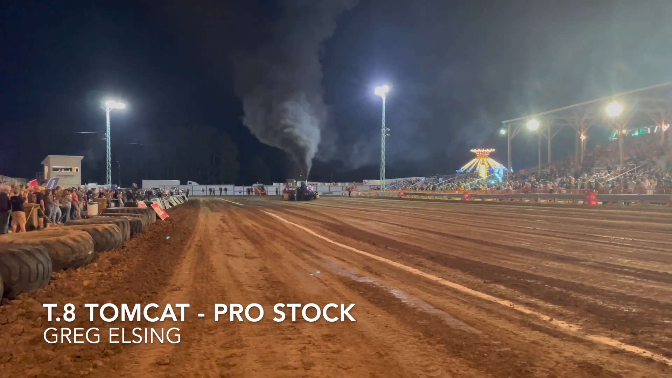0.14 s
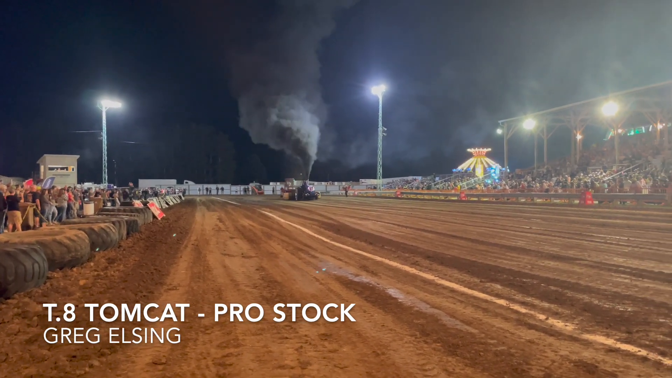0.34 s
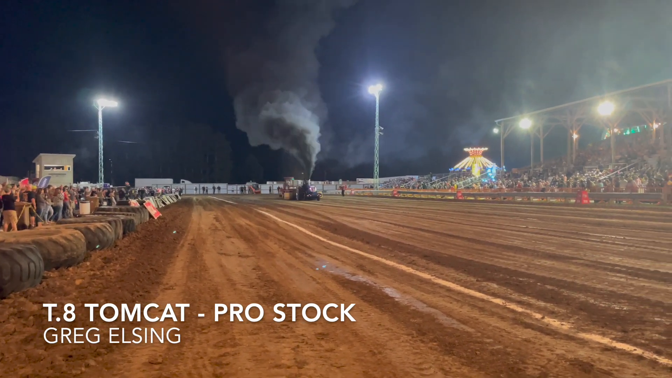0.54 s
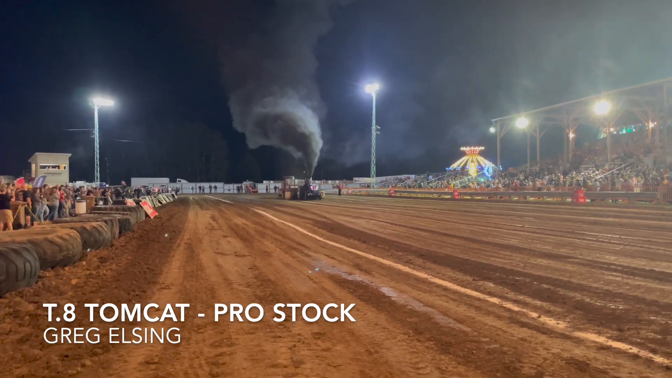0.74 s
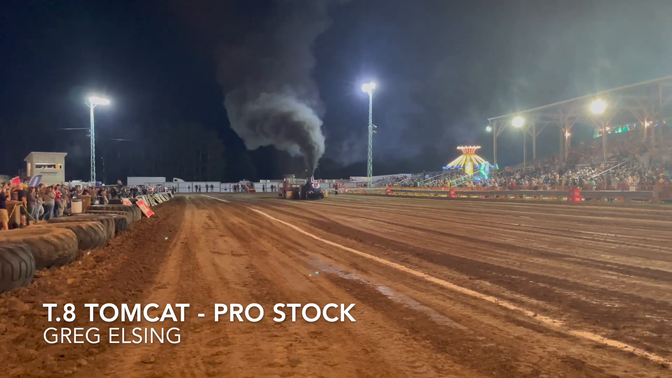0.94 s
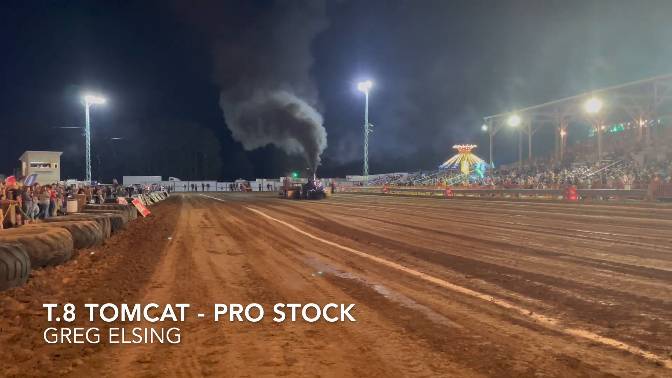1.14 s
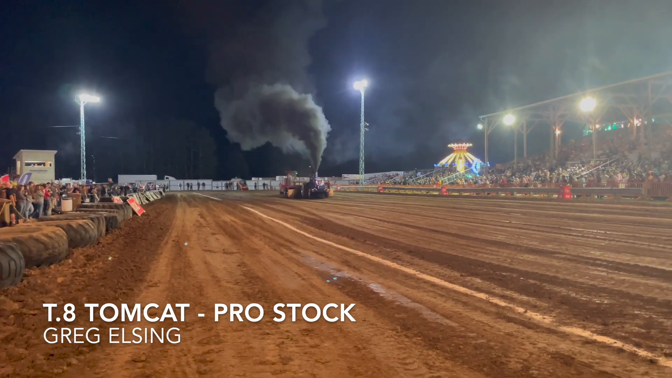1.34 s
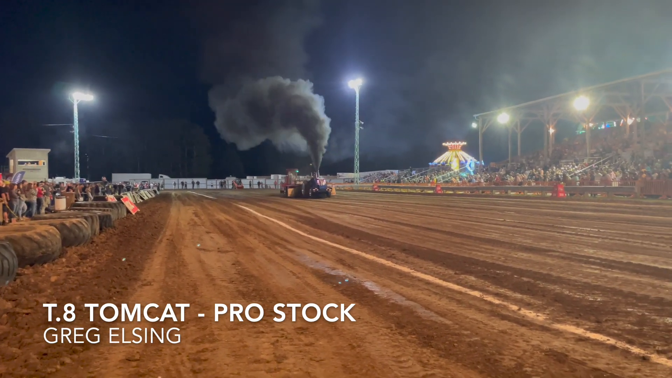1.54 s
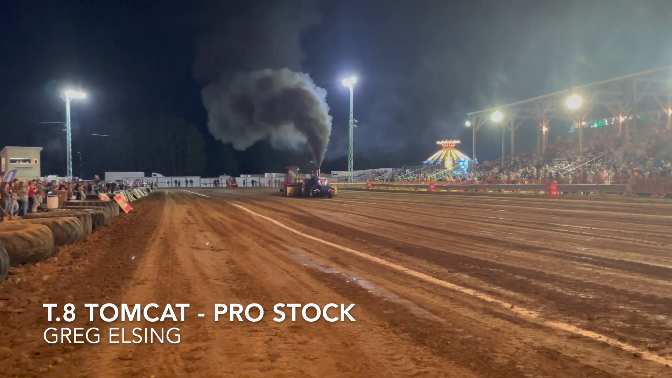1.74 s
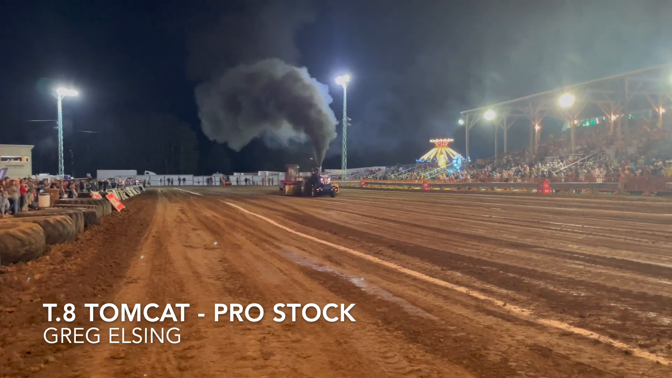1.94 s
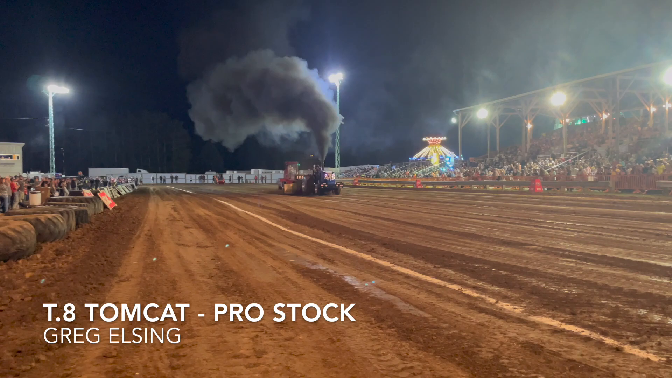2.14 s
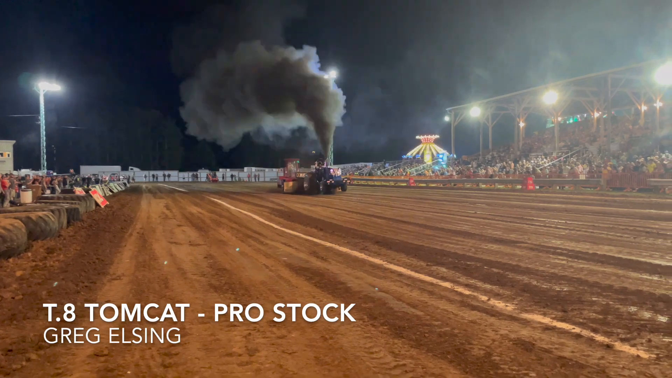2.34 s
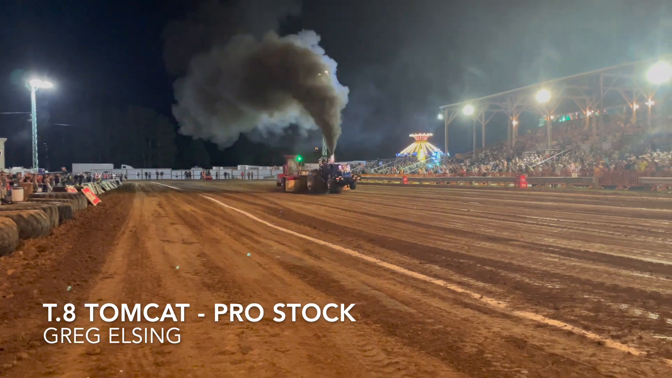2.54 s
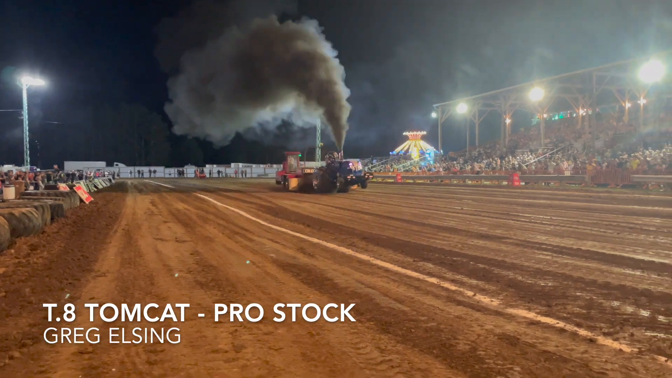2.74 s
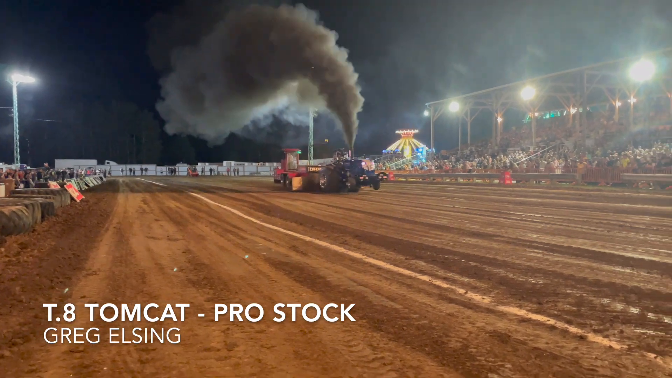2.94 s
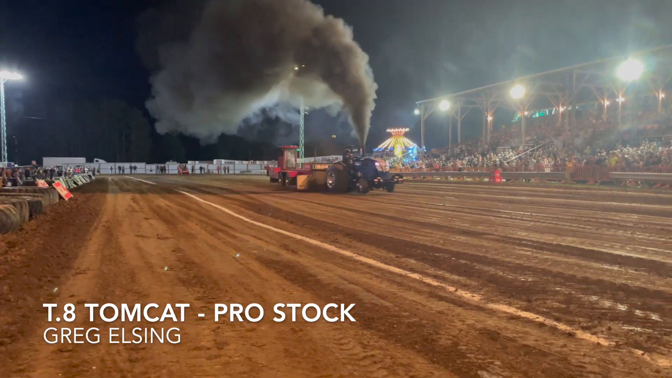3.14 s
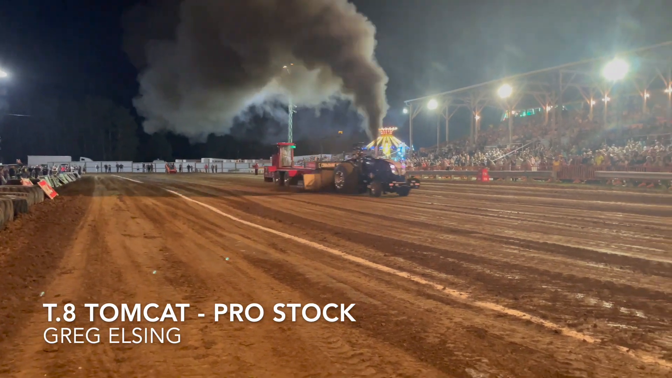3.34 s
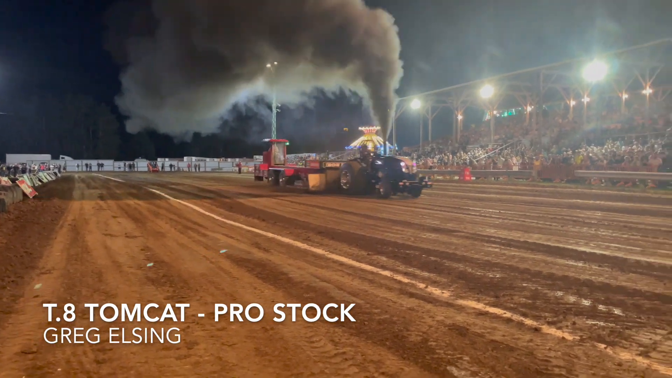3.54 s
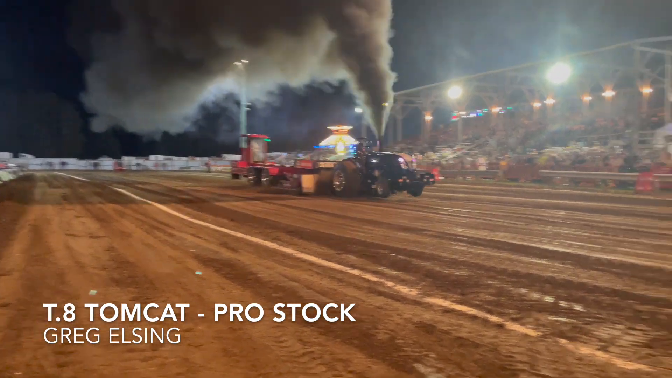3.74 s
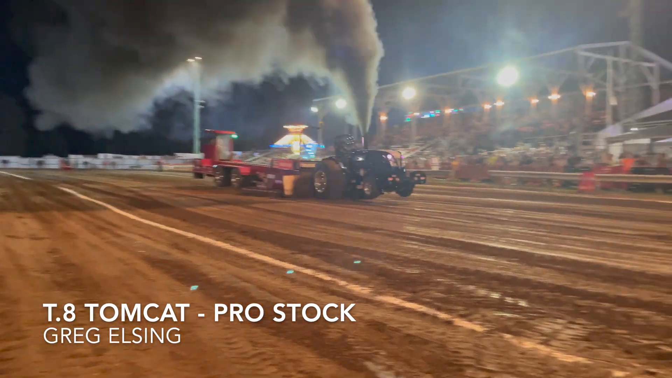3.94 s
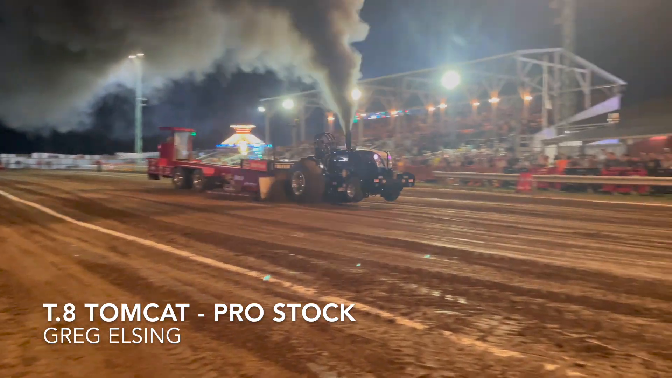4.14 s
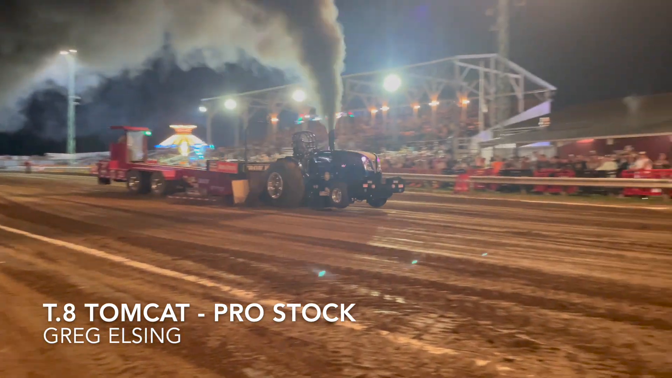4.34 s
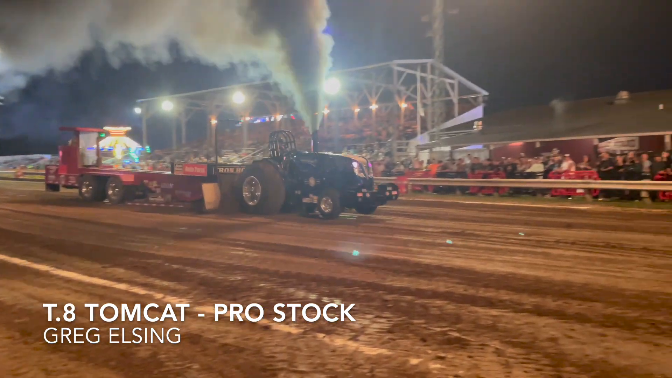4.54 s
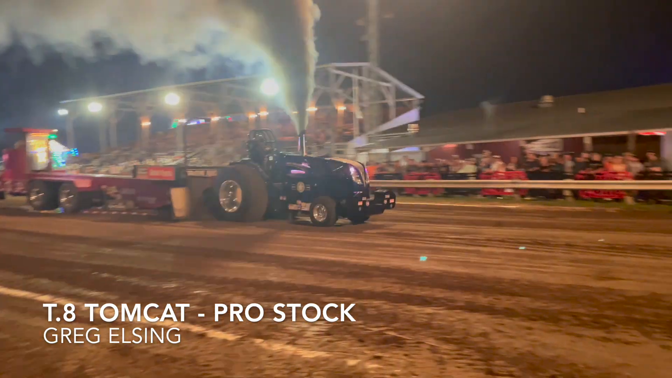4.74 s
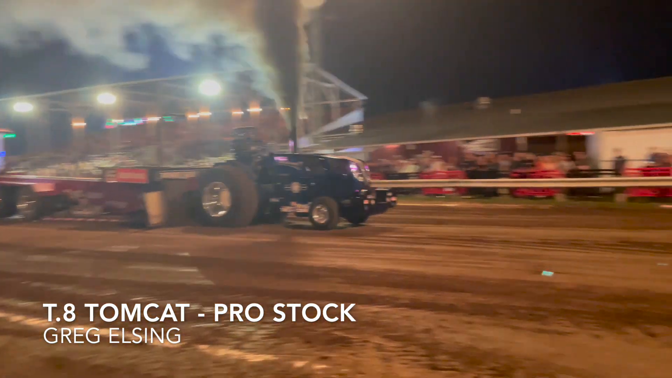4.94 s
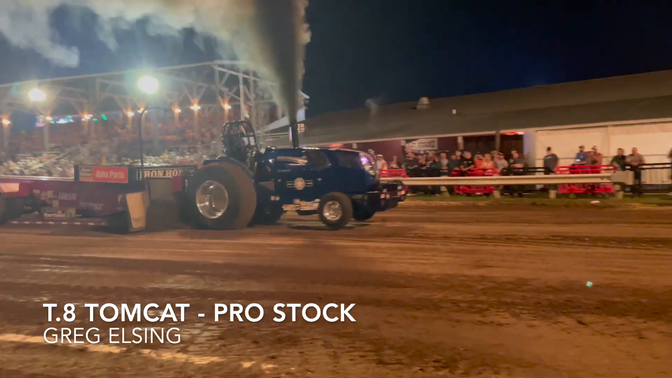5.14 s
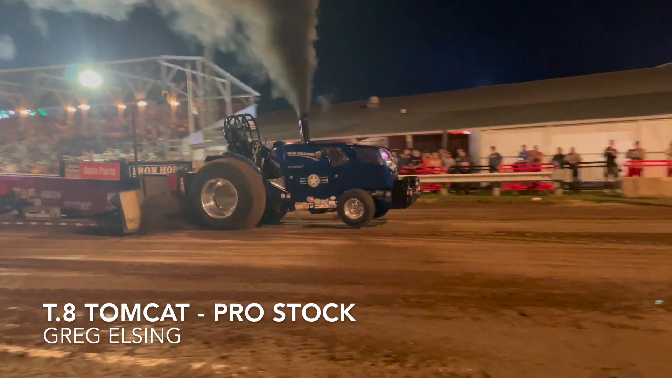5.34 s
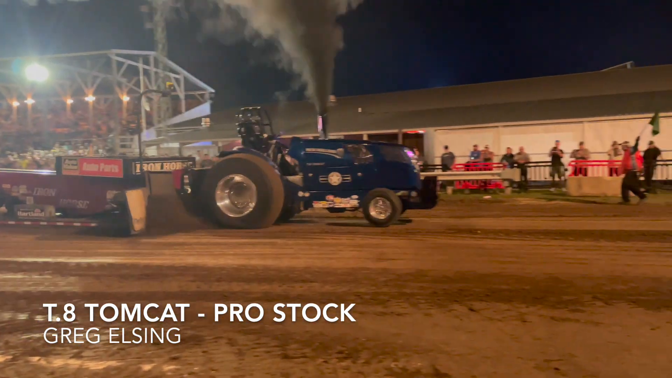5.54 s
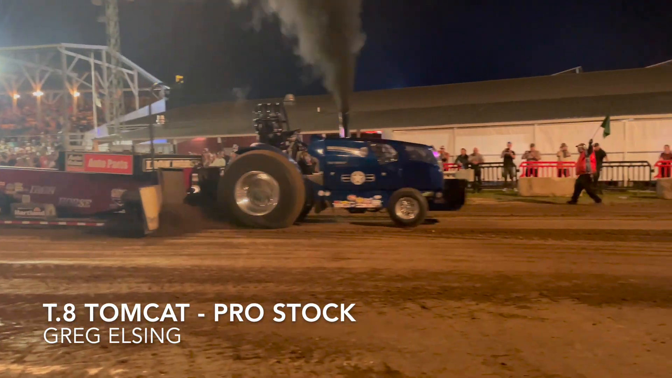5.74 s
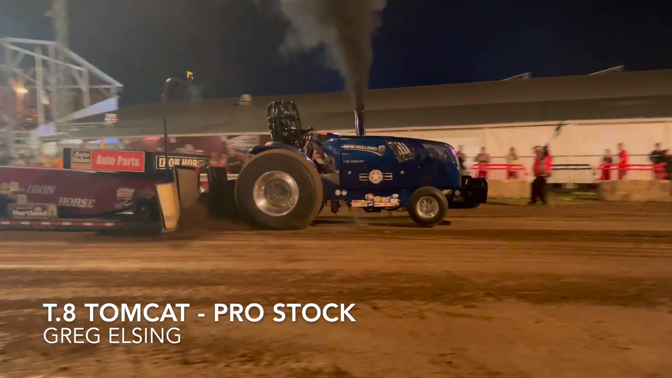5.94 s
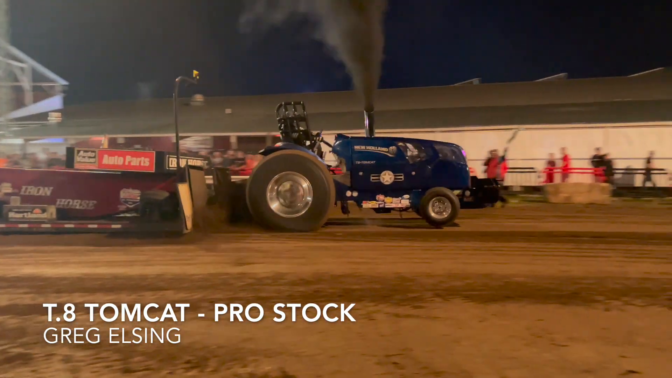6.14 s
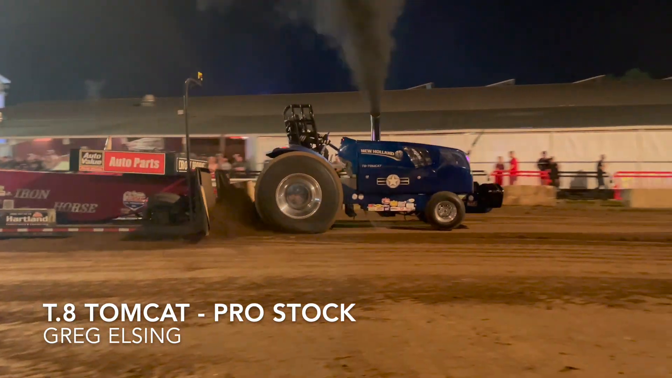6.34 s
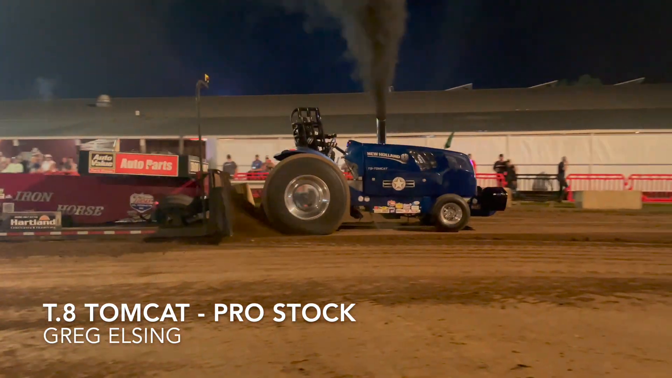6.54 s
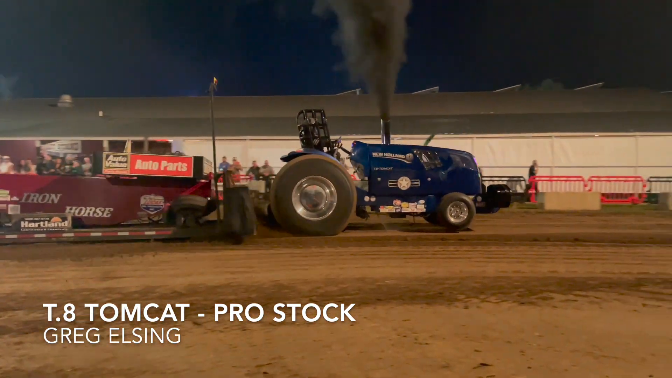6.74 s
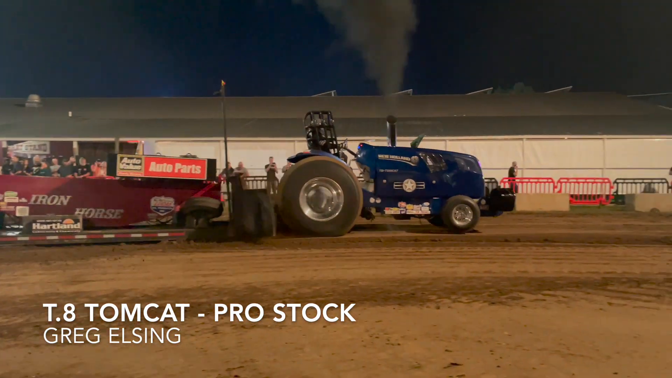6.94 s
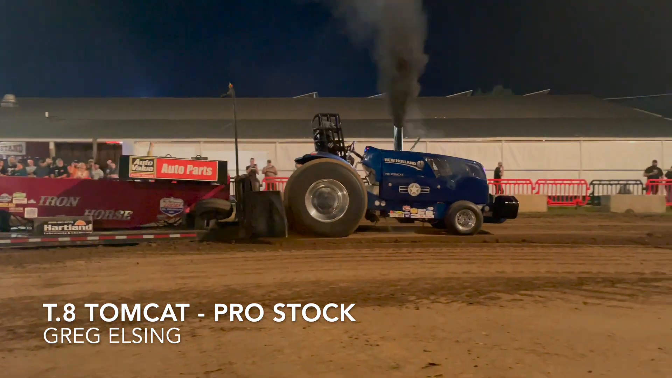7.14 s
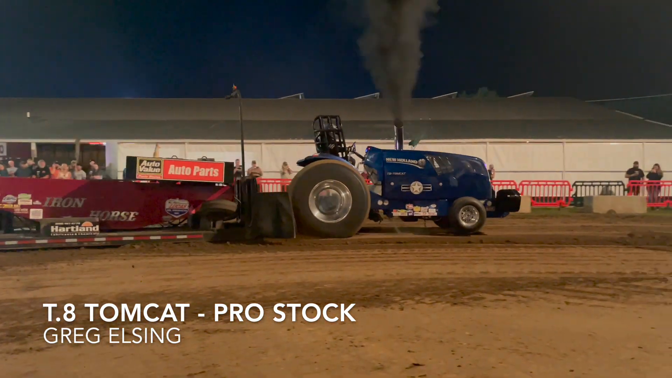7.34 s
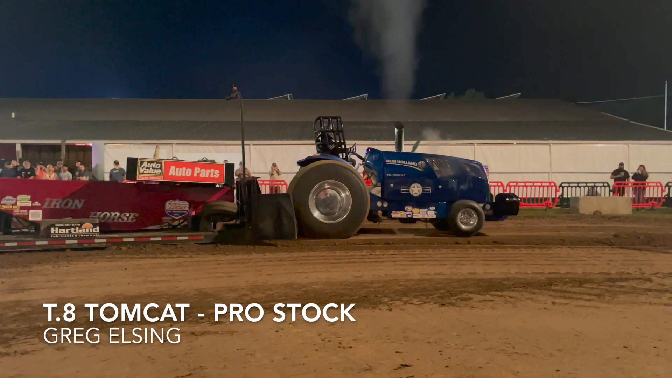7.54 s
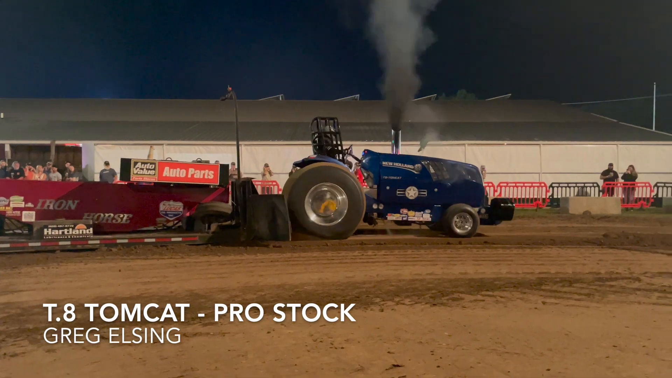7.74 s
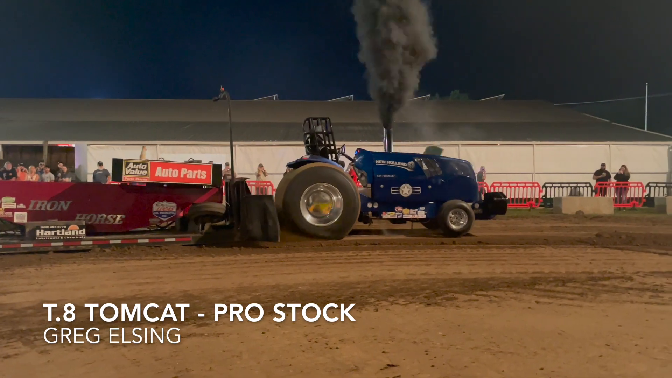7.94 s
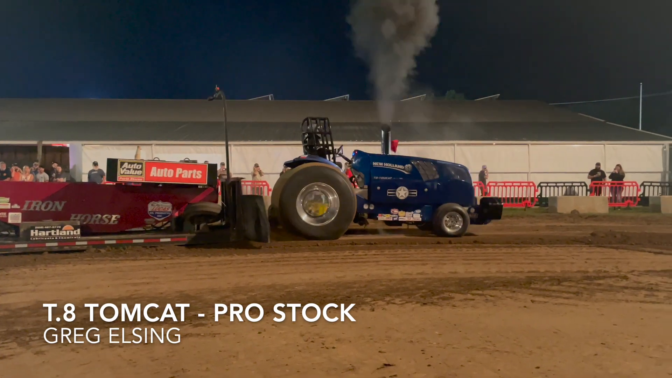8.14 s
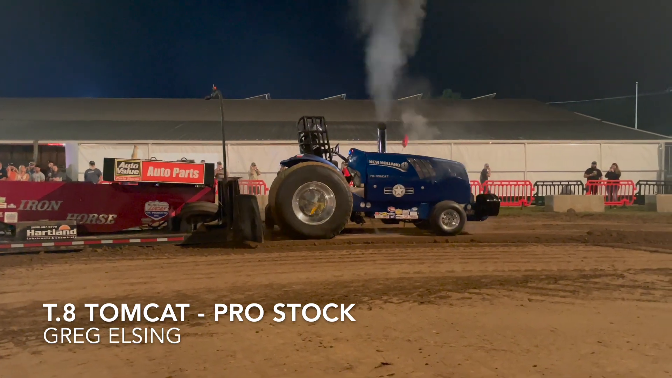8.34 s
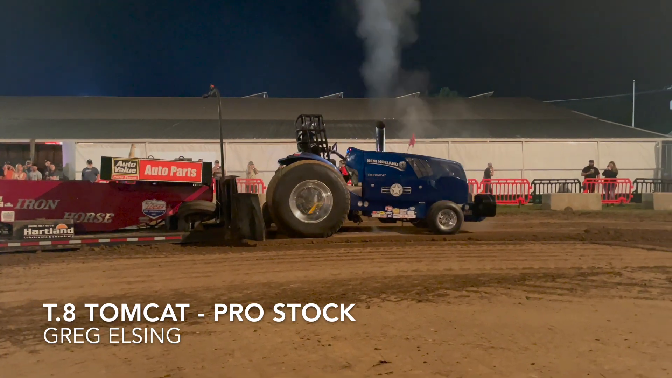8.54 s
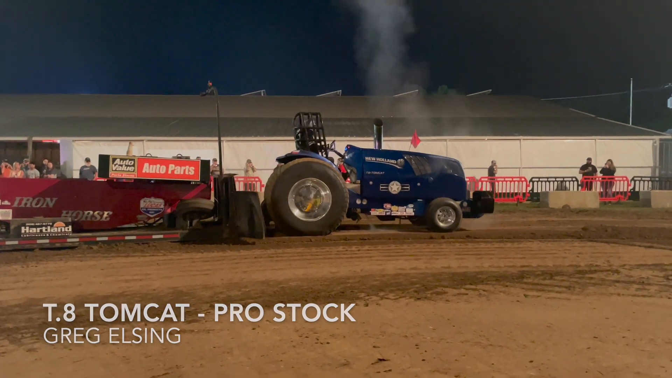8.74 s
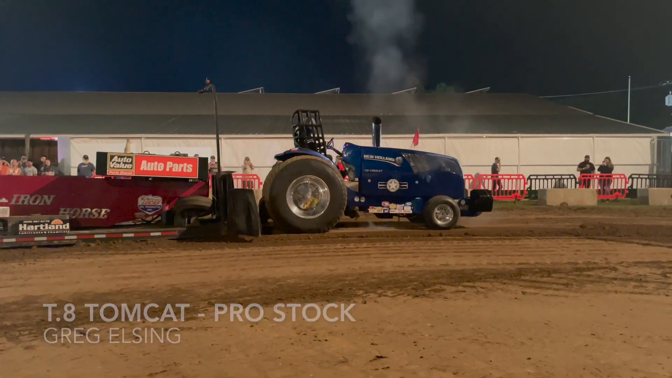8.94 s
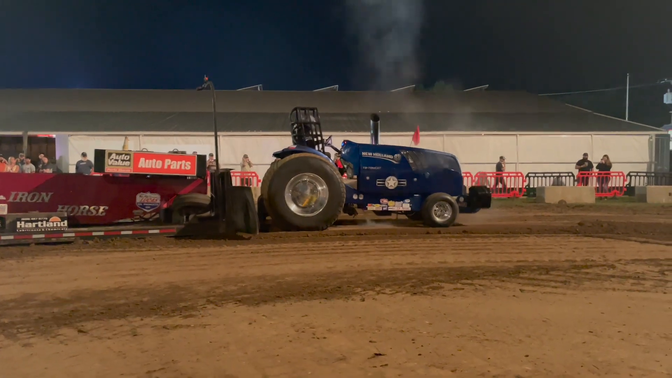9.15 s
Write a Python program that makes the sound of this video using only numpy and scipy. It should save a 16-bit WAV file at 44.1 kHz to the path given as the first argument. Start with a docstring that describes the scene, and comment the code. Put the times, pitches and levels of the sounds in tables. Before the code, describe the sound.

Outdoors at a dirt track, a turbocharged diesel tractor pulls a heavy sled at full throttle, a loud buzzing drone with bark, rasp and hiss, drawing nearer over about seven seconds. Beside the microphone the throttle closes: air chuffs back through the turbo with sinking honks, the whistle slides down, and brief throttle blips lift the engine before it settles to idle. A faint grandstand echo follows.

```python
"""A turbocharged six-cylinder tractor drags a sled flat out up a dirt track, over air buffeting and a grandstand echo.
The stack drones on engine orders, while shaped noise and ringing firing pulses make its roar, bark, rasp and hiss;
wavering sines make thin whines and the turbo's blade tone. The pull ends beside the microphone: the throttle closes,
the boost surges back in noise chuffs and sinking honks, and the turbo whistles down.
Blips of throttle lift the engine again before it settles to idle."""
import sys
import numpy as np
from scipy import signal
from scipy.fft import rfft, irfft, next_fast_len
from scipy.io import wavfile
from scipy.ndimage import map_coordinates

SR = 44100
rng = np.random.default_rng(int(sys.argv[2]) if len(sys.argv) > 2 else 0)


def bounce(signal):
    """Save signal as a 16-bit WAV file at the path given by the first command-line argument."""
    frames = np.transpose(np.atleast_2d(signal))
    limited = np.clip(frames, -1, 1)
    pcm = np.round(limited * 32767).astype(np.int16)
    wavfile.write(sys.argv[1], SR, pcm)


N = 405710

# engine speed while pulling: start_s, firing_hz
PULL_SPEED = [(0, 245), (0.17, 263), (0.4, 235), (0.6, 254), (0.85, 227), (1.1, 242), (1.5, 255),
              (1.77, 250), (1.9, 235), (2.25, 225), (2.52, 236), (2.66, 236), (2.85, 255), (3.02, 243),
              (3.37, 232), (3.62, 245), (3.82, 231), (4.08, 238), (4.3, 232), (4.62, 225), (4.95, 237),
              (5.35, 229), (5.62, 238), (5.85, 216), (6.1, 247), (6.35, 241), (6.75, 236), (6.9, 254),
              (7.1, 246)]
# stack and turbo levels up the track, before the run-down: start_s, bark_db, rasp_db, hiss_db, rush_db
PULL_LEVELS = [(0.0, -30, -27.5, -31, -35), (0.6, -29, -24.5, -30, -34), (2.5, -32, -24.5, -30, -31.5),
               (3.6, -26.5, -24, -26, -29), (3.95, -28.5, -26.5, -29, -31), (4.6, -24.5, -26, -29, -31),
               (4.95, -24.5, -27.2, -27, -31), (5.4, -26.5, -29, -29.5, -33.5),
               (6.9, -29, -28.0, -28, -33.5)]
# level of the firing note while pulling: start_s, level_db
DRONE_LEVEL = [(0.0, -17), (1.35, -18.5), (1.65, -14.5), (2.05, -22), (2.87, -18.5), (3.0, -21.5),
               (3.5, -14.5), (3.82, -24.5), (4.15, -15), (4.35, -19.5), (4.8, -19.5), (5.12, -25),
               (5.22, -31), (5.65, -26.5), (6.5, -36), (6.9, -33.5)]
# level of the bass while pulling: start_s, lope_db, roar_db, buffeting_db
BASS_LEVELS = [(0, -27, -27, -48), (1.9, -25.5, -32.5, -61), (3.8, -29, -34, -45),
               (4.7, -32.5, -32.5, -36.5), (5.5, -54, -32, -38), (6.1, -56, -35, -55)]
# pulse size of each cylinder in firing order: size (ratio)
CYLINDER_SIZES = [0.89, 0.32, 0.9, 0.61, 0.074, 0.18]
# engine orders: multiple (of the four-stroke cycle), level_db (relative)
# uneven firing below and around the firing note under load
LOPE_ORDERS = [(2, -4), (3, -5), (4, 1), (5, -9), (7, -8.5), (8, -6.5), (9, -9.5)]
# tones above the firing note
OVERTONE_ORDERS = [(12, 1), (15, -5), (16, -3)]
# uneven firing off load
COASTING_ORDERS = [(4, 3), (12, -7)]
# clean tones inside the stack's bark
GROWL_ORDERS = [(15, 0), (16, 0), (18, 0.5), (20, 0), (22, -4)]

# exhaust colour by position along the track: frequency_hz, density_db (dB per Hz, relative)
BARK_FAR = [(300, -28), (400, -6.5), (499, -5.5), (550, -11.5), (655, -0.5), (830, -0.5), (1000, -13.5),
            (1500, -63)]
BARK_NEAR = [(240, -60), (400, -15), (503, -13.5), (620, -4), (780, 3.5), (880, 0.5), (981, -15),
             (1150, -43), (1500, -60)]
BARK_SIDE = [(250, -46), (400, -12), (490, -11), (570, -2), (628, 0), (800, -0.5), (950, -13), (1150, -11),
             (1700, -60)]
RASP_FAR = [(800, -41), (1020, -9), (1150, -8.5), (1330, -6.5), (1660, 6), (1930, -8), (2180, -2.5),
            (2640, -12.5), (3100, -39), (4500, -60)]
RASP_NEAR = [(800, -25), (1000, -0.5), (1100, 1), (1270, -4.5), (1690, 3), (1880, -9), (2050, 0),
             (2550, -11.5), (3100, -9.5), (4500, -49)]
RASP_SIDE = [(590, -27), (1000, -3.5), (1090, -3), (1590, 5.5), (2320, -2), (2680, -0.5), (3100, -11.5),
             (4030, -52)]
RASP_IDLE = [(800, -46), (1100, -0.5), (1700, 0), (2000, 5), (2300, -5.5), (2800, -9), (4000, -47)]
HISS_FAR = [(1650, -11), (2800, -3), (3270, 5), (3630, -1), (4370, 0), (4960, 5.5), (5580, -2), (6060, 3.5),
            (6810, 3.5), (7440, -5.5), (8120, -2), (9000, -14.5), (11700, -42)]
HISS_NEAR = [(1650, -25), (2800, -8), (3390, -2.5), (3980, 2), (4330, -0.5), (4750, -1), (5600, -2.5),
             (6460, 0), (7400, -6), (8000, -3.5), (9000, -9), (11700, -47)]
HISS_SIDE = [(1650, -19), (2800, -2.5), (3520, -2), (3940, 1.5), (4680, -1), (5210, 4), (5580, -7),
             (6060, 4), (6880, 0.5), (7440, -7.5), (8450, -3.5), (9000, -7.5), (11700, -69)]
ROAR_FAR = [(30, -18), (70, -11.5), (170, -1.5), (300, -3), (420, -7), (520, -18), (800, -56)]
ROAR_SIDE = [(30, -38), (70, -14), (140, -9.5), (300, -0.5), (410, -8), (520, -12), (800, -44)]
# colour of the air buffeting, the turbo rush and the surge chuffs: frequency_hz, density_db (dB per Hz, relative)
BUFFET_COLOUR = [(20, -35), (40, -9), (65, 0), (130, -1), (300, -54)]
RUSH_COLOUR = [(8500, -43), (10000, -6), (10800, 1.5), (13300, -1), (15700, -12.5)]
CHUFF_COLOUR = [(250, -6.5), (480, -13), (650, 9.5), (900, 0), (1350, 2.5), (1650, -2), (2000, 0),
                (2450, -8), (3100, -18), (5000, -12), (10000, -31)]

# turbo speed heard as its blade tone: start_s, pitch_hz
BLADE_PITCH = [(0, 11060), (4.9, 10750), (6.95, 10900), (7.14, 9050), (7.27, 8600), (7.42, 8850),
               (7.61, 8450), (7.66, 7900), (7.81, 7400), (8.46, 5450), (8.65, 4750), (9.2, 3540)]
# the blade tone flares up: centre_s, half_width_s, level_db
BLADE_FLARES = [(2.3, .35, -39), (4.9, .3, -36), (7.37, 0.15, -42), (7.65, .03, -39), (7.805, 0.018, -41),
                (8.5, .04, -48), (8.65, .04, -47), (8.79, .08, -49), (9.14, .1, -54)]
# compressor surges: start_s, length_s, level_db (halfway), honk_start_hz, honk_db (relative to level_db)
SURGES = [(7.084, 0.056, -20.5, 870, -9), (7.536, 0.06, -25, 965, -4), (7.711, 0.055, -27.5, 890, -3),
          (8.188, 0.046, -34.5, 790, 7), (8.375, 0.06, -39, 680, -5)]
# thin whines standing out of the jet: centre_s, half_width_s, pitch_hz, level_db
WHINES = [(0.5, 0.9, 5920, -39), (3.7, 0.25, 4750, -35.5), (4.15, 0.2, 4070, -38), (4.75, 0.49, 5233, -42)]
# throttle blips: start_s, length_s, start_firing_hz, top_firing_hz, climb_s, note_db, note_swell_s
BLIPS = [(7.191, 0.23, 185, 226, 0.17, -23.5, 0.29), (7.71, .325, 161, 189, 0.38, -27, 0.015),
         (8.743, 0.06, 153, 157, 0.046, -32.5, 0.029)]
# band lifted by the ground reflection, sinking as the tractor nears: start_s, centre_hz
GROUND_BAND = [(1.5, 450), (2.3, 385), (3.3, 355), (4.0, 285)]
# stack kick once per crankshaft turn: start_s, added_gain (ratio at the crest)
KICK_DEPTH = [(2.5, 0.35), (4.6, 0.8)]

# stereo spread: frequency_hz, side_minus_mid_db
STEREO_WIDTH = [(60, -9), (100, -35), (180, -9.5), (310, -7), (550, -1.5), (950, -4), (1650, -4), (2860, 3),
                (4970, 1.5), (8640, 1), (15000, 27)]
# stereo tilt: frequency_hz, left_minus_right_db
STEREO_LEAN = [(80, 0), (160, -2), (500, 0), (1300, 1.5), (2000, -4), (3300, 1.5), (5500, 7), (9000, 4),
               (10800, -3)]
# decay of the grandstand's answer: frequency_hz, t60_s
STAND_DECAY = [(150, 1), (1500, 0.64), (10000, 0.41)]

MONO_HZ = 10250  # the tractor and its echo are alike in both channels above this
TOP_HZ = 15850  # recorder's band limit
# fall of each sound as the turbo runs down, dB per octave of turbo speed
BARK_SAG_DB, RASP_SAG_DB, HISS_SAG_DB = 8.5, 13.5, 12
RUSH_SAG_DB, ROAR_SAG_DB, LOPE_SAG_DB = 16.5, 10.5, 5.5
RUSH_HOLD = 0.25  # octaves the turbo can slow before its rush starts to fade
NO_BOOST = 1.03  # octaves of run-down after which roar, bark and rasp sag no further
WHISTLE_DB = -64  # blade tone between flares
LIFT_S, OPEN_S, CLOSE_S = 6.95, 0.036, 0.054  # end of the pull; throttle opening and closing times
IDLE_HZ, COAST_CURVE = 139.6, 1.6  # firing rate at idle; a coasting engine slows fastest at first
LOPE_FROM_S, COAST_LOPE_DB = 7.72, -30  # uneven firing returns short of boost; level before its sag
COAST_NOTE_DB, IDLE_SWELL_DB, IDLE_FROM_S = -43, 6, 8.8  # closed-throttle firing note; its rise at idle
GROUND_DB, GROUND_OCTAVES = -34, 0.13  # peak level of a lifted order; width of the band
HONK_SAG_OCTAVES_PER_S = 2.0


def amp(db):
    """Decibels to gain."""
    return 10 ** (np.asarray(db) / 20)


def unit(x):
    """Scaled to rms 1."""
    return x / np.sqrt(np.mean(x ** 2) + 1e-20)


def seconds():
    """Time of every sample."""
    return np.arange(N) / SR


def along(points, hz):
    """(Hz, value) points read on a log frequency axis."""
    f, v = np.transpose(points)
    return np.interp(np.log(hz + 1), np.log(f + 1), v)


def curves(rows):
    """One value per sample for each column after the time."""
    s, *columns = np.transpose(rows)
    return [np.interp(seconds(), s, column) for column in columns]


def wobble(rate):
    """A smooth random curve, rate knots a second."""
    knots = rng.standard_normal(int(N * rate / SR) + 4)
    coarse = np.arange(0, N + 64, 64)
    return np.interp(np.arange(N), coarse, map_coordinates(knots, [coarse * rate / SR]))


def ramp(start, length):
    """0 before start, rising to 1 over length seconds."""
    return np.clip((seconds() - start) / length, 0, 1)


def swell(s, width):
    """A smooth rise and fall around time s."""
    return np.exp(-((seconds() - s) / width) ** 2)


def sweep(pitch_hz):
    """A sine following a moving pitch."""
    return np.sin(2 * np.pi * np.cumsum(pitch_hz) / SR)


def filtered(x, response):
    """x times a complex response of frequency."""
    m = next_fast_len(N + 8192, True)
    return irfft(rfft(x, m) * response(np.fft.rfftfreq(m, 1 / SR)), m)[..., :N]


def coloured(x, spectrum):
    """x through a spectrum, at rms 1."""
    return unit(filtered(x, lambda hz: amp(along(spectrum, hz))))


def noise():
    """Two unrelated noises: the direct sound and the scattered sound."""
    return rng.standard_normal((2, N))


def direct_only(x):
    """x as direct sound, with no scattered part."""
    return x * [[1], [0]]


def passing(x, spectra, times):
    """x fades from colour to colour as the tractor reaches one position after another."""
    shares = [np.interp(seconds(), times, row) for row in np.eye(len(times))]
    return sum(share * coloured(x, spectrum) for share, spectrum in zip(shares, spectra))


def buffeting():
    """Moving air thumps each microphone port on its own: low noise, part shared and part opposed."""
    lumps = amp(curves(BASS_LEVELS)[2] + 3.4 * wobble(14))
    shared, own = coloured(noise(), BUFFET_COLOUR)
    return lumps * (shared + 0.92 * own * np.array([[1], [-1]]))


def grandstand(x, delay_s=.09):
    """A late, dull answer from the stand: a noise tail whose treble dies soonest."""
    hz, t, z = signal.stft(rng.standard_normal((2, SR)), SR, nperseg=256)
    decay = amp(-60 * t / along(STAND_DECAY, hz)[:, None])
    tail = signal.istft(z * decay, SR, nperseg=256)[1]
    late = np.pad(x, (int(delay_s * SR), 0))[None]
    return signal.fftconvolve(late, tail / np.linalg.norm(tail[0]), axes=1)[:, :N]


def pulling():
    """1 during the pull, 0 once the driver lifts."""
    return 1 - ramp(LIFT_S, CLOSE_S)


def blip(s, length, rise):
    """One push on the throttle: rise, hold, close."""
    return ramp(s, rise) * (1 - ramp(s + length, CLOSE_S))


def throttled(closed_db):
    """Gain of a sound that drops when the throttle closes."""
    opening = pulling() + sum(blip(s, length, OPEN_S) for s, length, *_ in BLIPS)
    return amp(closed_db * (1 - opening))


def firing_rate():
    """After the pull the engine coasts down towards idle and climbs again with each blip."""
    rate, = curves(PULL_SPEED)
    since, last_hz = PULL_SPEED[-1]

    def coast(start, end):
        return 1 - (1 - ramp(start, end - start)) ** COAST_CURVE

    for s, length, low_hz, top_hz, climb, *_ in BLIPS:
        rate = rate + (low_hz - last_hz) * coast(since, s)
        rate = rate + (top_hz - low_hz) * ramp(s, climb)
        since, last_hz = s + length, top_hz
    return rate + (IDLE_HZ - last_hz) * coast(since, N / SR)


def run_down():
    """Octaves by which the turbo has slowed since the driver lifted."""
    blade_hz, = curves(BLADE_PITCH)
    return (1 - pulling()) * np.log2(blade_hz[int(LIFT_S * SR)] / blade_hz)


def tone(cycle, multiple, flutter_db, drift, rate):
    """One engine order of rms 1, shaken by uneven burning and turbulent air."""
    phase = 2 * np.pi * (multiple * cycle + rng.random()) + drift * wobble(rate)
    return unit(amp(flutter_db * wobble(rate)) * np.sin(phase))


def orders(cycle, table, flutter_db, drift, rate):
    """A set of engine tones at their own strengths."""
    return sum(amp(db) * tone(cycle, round(k), flutter_db, drift, rate) for k, db in table)


def firings(cycle, scatter_db, jitter_s, even_share=0.76):
    """One pulse for each cylinder; the turbine smooths away most of what the pulses have in common."""
    at = np.flatnonzero(np.diff(np.floor(len(CYLINDER_SIZES) * cycle)))
    chance = rng.standard_normal((len(at), 2))
    size = np.resize(CYLINDER_SIZES, len(at)) * amp(scatter_db * chance[:, 0])
    size = size - even_share * np.mean(CYLINDER_SIZES)
    at = np.clip(at + jitter_s * SR * chance[:, 1], 0, N - 1).astype(int)
    return np.bincount(at, size, N)


def ringing(x, t60_s):
    """Each pulse rattles on for a moment, along paths that shift as the tractor moves."""
    t = np.arange(SR // 20) / SR
    tails = rng.standard_normal((2, len(t))) * amp(-60 * t / t60_s)
    a, b = signal.fftconvolve(x[None], tails, axes=1)[:, :N]
    shift = 2 * wobble(2)
    return unit(np.cos(shift) * a + np.sin(shift) * b)


def puffs(cycle, shaft_depth, firing_depth):
    """Turbulence that swells with each crankshaft turn and each firing."""
    turn = 2 * np.pi * cycle
    surge = shaft_depth * np.cos(2 * turn) + firing_depth * np.cos(len(CYLINDER_SIZES) * turn)
    return unit(noise() * np.exp(surge))


def whines(smear=0.014, drift=.005):
    """Narrow, breathy tones that drift a little as they come and go."""
    out = np.zeros((2, N))
    for s, width, hz, db in WHINES:
        pitch_hz = hz * (1 + smear * wobble(400) + drift * wobble(4.6))
        breathy = unit(amp(4.8 * wobble(60)) * sweep(pitch_hz))
        out[0] += amp(db) * swell(s, width) * breathy
    return out


def turbo(smear=.012, waver=.004):
    """Air rushes through the compressor; its blade tone, smeared by turbulence, sinks as the boost goes."""
    blade_hz, = curves(BLADE_PITCH)
    strength = amp(WHISTLE_DB) + sum(amp(db) * swell(s, width) for s, width, db in BLADE_FLARES)
    # direct and scattered sound waver separately
    paths = [sweep(blade_hz * (1 + smear * wobble(350) + waver * wobble(25))) for _ in range(2)]
    whistle = strength * unit(amp(3.5 * wobble(45)) * np.array(paths))
    sag_db = RUSH_SAG_DB * np.maximum(run_down() - RUSH_HOLD, 0)
    rush_db = curves(PULL_LEVELS)[3] - sag_db + 0.79 * wobble(13)
    return whistle + amp(rush_db) * coloured(noise(), RUSH_COLOUR)


def surges(cycle, attack_s=0.003, release_s=0.013, fade_db_per_s=40):
    """Boost blows back through the compressor: crackling chuffs that fade, each with a sinking honk."""
    out = np.zeros((2, N))
    crackle = amp(1.5 * wobble(300))
    air = coloured(crackle * puffs(cycle, shaft_depth=0.1, firing_depth=0.15), CHUFF_COLOUR)
    for s, length, db, honk_hz, honk_db in SURGES:
        age = np.maximum(seconds() - s, 0)
        gate = np.clip(age / attack_s, 0, 1) * np.exp(-np.maximum(age - length, 0) / release_s)
        # the pressure drains through the chuff
        chuff = amp(fade_db_per_s * (length / 2 - age)) * air
        pitch_hz = honk_hz * 2 ** (-HONK_SAG_OCTAVES_PER_S * age) * (1 + .035 * wobble(250))
        honk = direct_only(unit(crackle * sweep(pitch_hz)))
        out += amp(db) * gate * (chuff + amp(honk_db) * honk)
    return out


def kicks(cycle, sharpness=6):
    """Gain of the stack: a short kick with every crankshaft turn."""
    return 1 + curves(KICK_DEPTH)[0] * np.exp(-sharpness * np.cos(2 * np.pi * cycle) ** 2)


def low_roar(slowed):
    """Low noise of the gas flow, sagging with the boost."""
    level_db = curves(BASS_LEVELS)[1] - ROAR_SAG_DB * slowed
    return amp(level_db) * passing(noise(), [ROAR_FAR, ROAR_SIDE], [5.6, 6.2])


def stack_bark(cycle, blows, slowed):
    """The pipe colours firing pulses, noise and clean engine orders, kicked by the crankshaft."""
    colours = [BARK_FAR, BARK_NEAR, BARK_NEAR, BARK_SIDE, BARK_SIDE, BARK_NEAR]

    def stack(x):
        return passing(kicks(cycle) * x, colours, [2.3, 3.5, 4.7, 5.4, 7.0, 7.9])

    rough = stack(amp(-2.5) * blows + noise())
    growl = direct_only(stack(orders(cycle, GROWL_ORDERS, flutter_db=2.2, drift=0.4, rate=24)))
    # share of clean growl: roughest on the approach, cleanest alongside
    clean = np.interp(seconds(), [1.8, 3.5, 4.7], [.25, .12, .28])
    bark = np.sqrt(1 - clean) * rough + np.sqrt(clean) * growl
    level_db = curves(PULL_LEVELS)[0] - BARK_SAG_DB * slowed + 0.78 * wobble(13)
    return bark * amp(level_db) * throttled(closed_db=-6.5)


def stack_rasp(cycle, blows, slowed):
    """Tearing gas: turbulence puffed by the engine, with ringing pulses beneath."""
    tearing = amp(-8.0) * blows + puffs(cycle, shaft_depth=0.088, firing_depth=0.086)
    colours = [RASP_FAR, RASP_NEAR, RASP_SIDE, RASP_SIDE, RASP_IDLE]
    rasp = passing(tearing, colours, [2.1, 3.9, 5.5, 6.9, 7.3])
    level_db = curves(PULL_LEVELS)[1] - RASP_SAG_DB * slowed + 0.73 * wobble(14)
    return rasp * amp(level_db) * throttled(closed_db=-5.5)


def jet_hiss():
    """Treble noise of the jet leaving the stack."""
    hiss = passing(noise(), [HISS_FAR, HISS_NEAR, HISS_SIDE], [2.5, 3.6, 5])
    level_db = curves(PULL_LEVELS)[2] - HISS_SAG_DB * run_down() + 0.76 * wobble(14)
    return hiss * amp(level_db) * throttled(closed_db=-3.0)


def exhaust(cycle):
    """The gas leaving the stack: a low roar, a barking pipe, a rasp and a hissing jet."""
    slowed = np.minimum(run_down(), NO_BOOST)
    # the firing pulses belong to the direct sound alone
    blows = direct_only(ringing(firings(cycle, scatter_db=2.0, jitter_s=.00006), t60_s=0.034))
    bark = stack_bark(cycle, blows, slowed)
    rasp = stack_rasp(cycle, blows, slowed)
    return low_roar(slowed) + bark + rasp + jet_hiss()


def grounded(cycle):
    """Each engine order swells as the band lifted by the ground reflection sinks through it."""
    centre_hz, = curves(GROUND_BAND)
    cycle_hz = np.gradient(cycle) * SR
    tones = 0
    for k in range(7, 12):
        octaves_off = np.log2(k * cycle_hz / centre_hz)
        lift = np.exp(-(octaves_off / GROUND_OCTAVES) ** 2)
        tones = tones + lift * tone(cycle, k, flutter_db=1.5, drift=0.2, rate=18)
    return amp(GROUND_DB) * swell(2.9, 1.5) * tones


def note_strength(linger_s=0.049):
    """The firing note is strong under load and in each blip, then dies away to a faint coasting note."""
    blips = 0
    for s, length, *_, db, rise in BLIPS:
        dying = np.exp(-np.maximum(seconds() - s - length, 0) / linger_s)
        blips = blips + amp(db) * ramp(s, rise) * dying
    loaded = pulling() * amp(curves(DRONE_LEVEL)[0])
    # the note swells as the engine settles to idle
    coasting = (1 - pulling()) * amp(COAST_NOTE_DB + IDLE_SWELL_DB * ramp(IDLE_FROM_S, 0.17))
    return loaded + coasting + blips


def drone(cycle, overtone_db=-16.5):
    """The firing note, its overtones, and the lope of unequal cylinders."""
    note = tone(cycle, len(CYLINDER_SIZES), flutter_db=1.1, drift=0.16, rate=30)
    # the overtones carry forward along the track and fade as the tractor draws level
    ahead = amp(overtone_db + np.interp(seconds(), [2.3, 3.4], [0, -14]))
    note = note + ahead * unit(orders(cycle, OVERTONE_ORDERS, flutter_db=2, drift=0.2, rate=18))
    lope = unit(orders(cycle, LOPE_ORDERS, flutter_db=2.5, drift=0.38, rate=26))
    loaded = amp(curves(BASS_LEVELS)[0]) * lope
    # off load the lope settles on other orders
    idling = unit(orders(cycle, COASTING_ORDERS, flutter_db=2.0, drift=0.73, rate=26))
    idling = idling * amp(COAST_LOPE_DB - LOPE_SAG_DB * run_down())
    idling = idling * ramp(LOPE_FROM_S, 0.17) * throttled(closed_db=-5.0)
    return note_strength() * note + loaded + grounded(cycle) + idling


def ports(pair, lead=0.41, scattered=0.91):
    """Two microphone ports: direct sound reaches the left one first, scattered sound differs between them."""
    direct, diffuse = pair

    def width(hz):
        return amp(along(STEREO_WIDTH, hz)) * (hz < MONO_HZ)

    def direct_side(hz):
        lean = np.tanh(np.log(amp(along(STEREO_LEAN, hz)))) * (hz < MONO_HZ)
        # the quarter-turn of phase puts the left port ahead
        return 1j * lead * width(hz) + lean * (1 + width(hz) ** 2) / 2

    side = filtered(direct, direct_side) + scattered * filtered(diffuse, width)
    return np.array([direct + side, direct - side])


def scene():
    """The tractor and its echo at the two ports, over the buffeting air."""
    cycle = np.cumsum(firing_rate()) / SR / len(CYLINDER_SIZES)  # four-stroke cycles run so far
    tractor = whines() + turbo() + surges(cycle) + exhaust(cycle) + direct_only(drone(cycle))
    echo = amp(-16.5) * grandstand(tractor[0])
    return buffeting() + ports(tractor + echo)


def record(dry):
    """The recorder keeps nothing above its band limit."""
    return filtered(dry, lambda hz: hz < TOP_HZ)


dry = scene()
out = record(dry)
bounce(out)
```